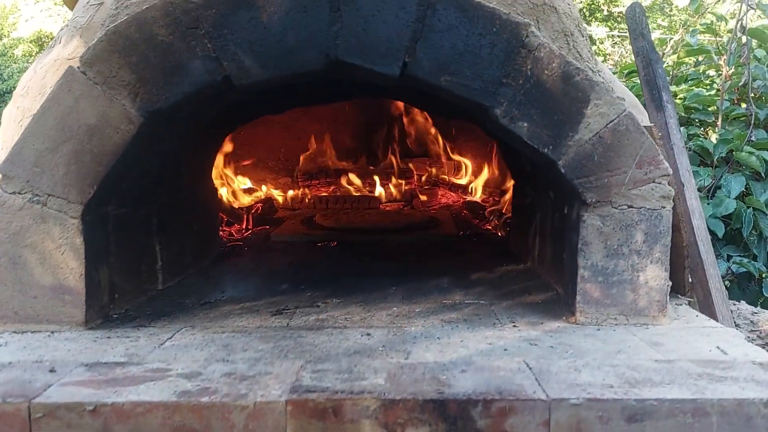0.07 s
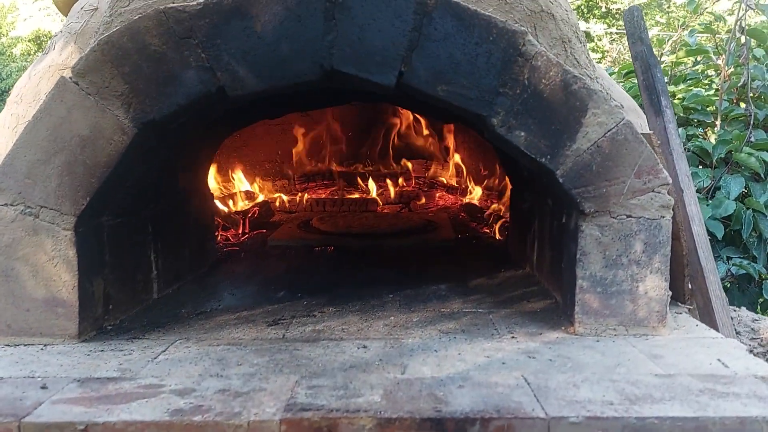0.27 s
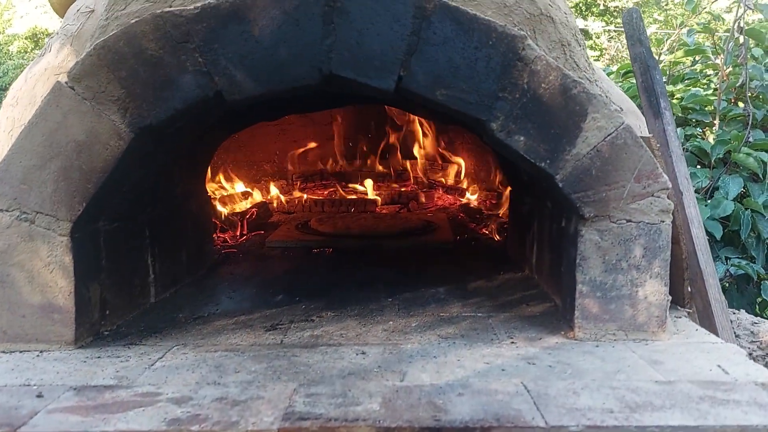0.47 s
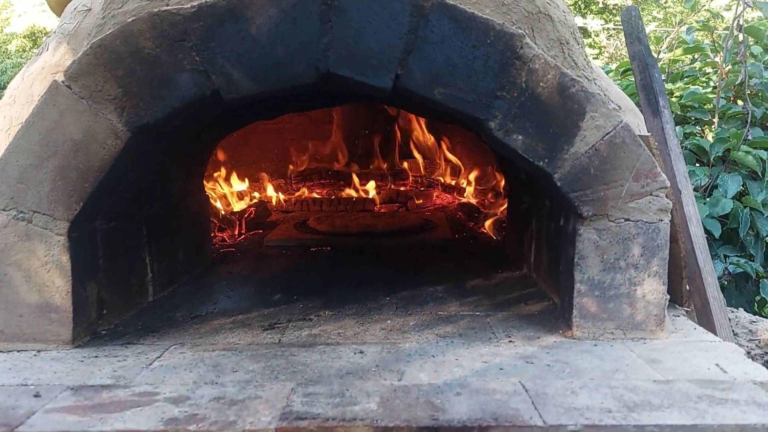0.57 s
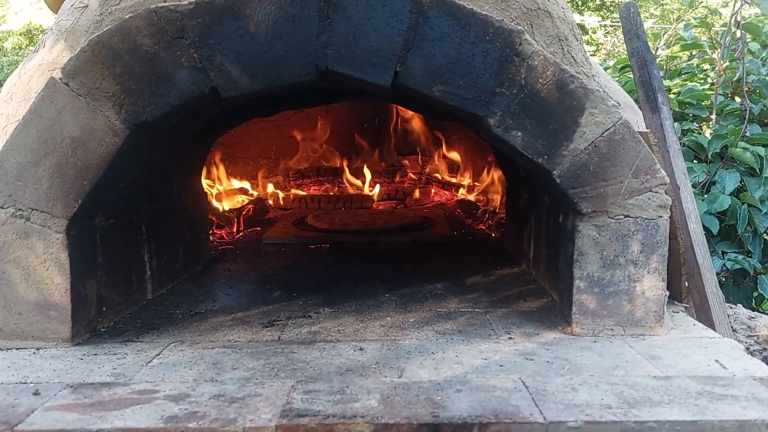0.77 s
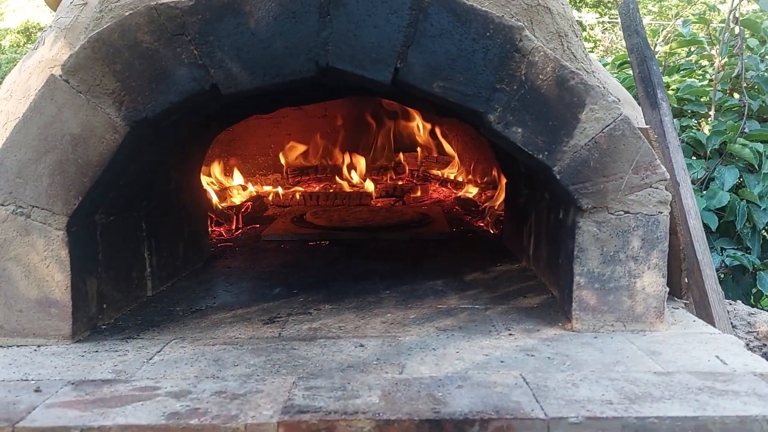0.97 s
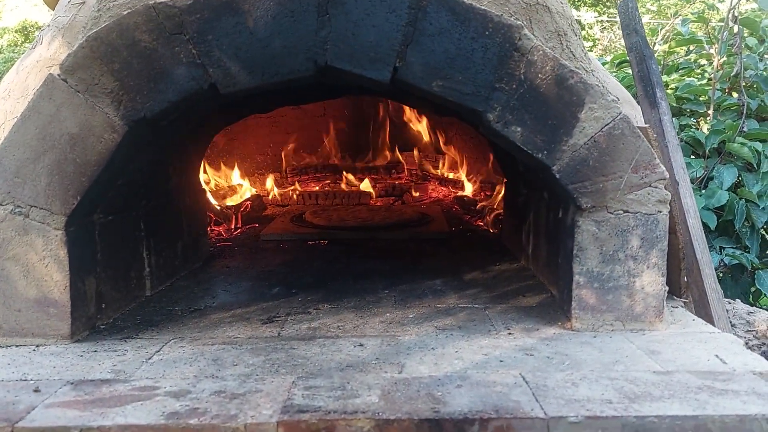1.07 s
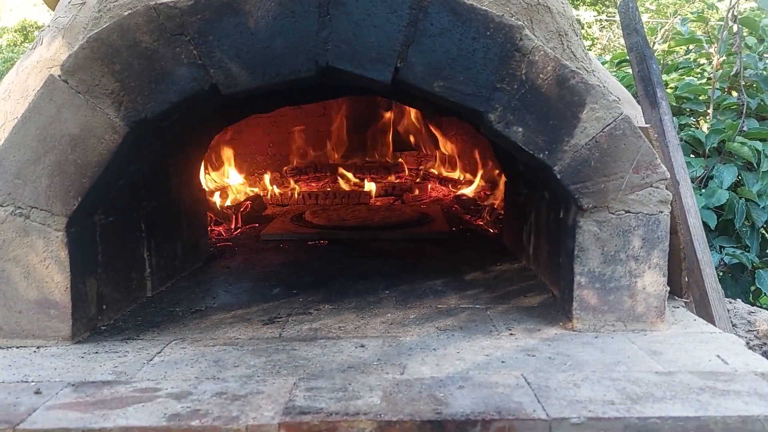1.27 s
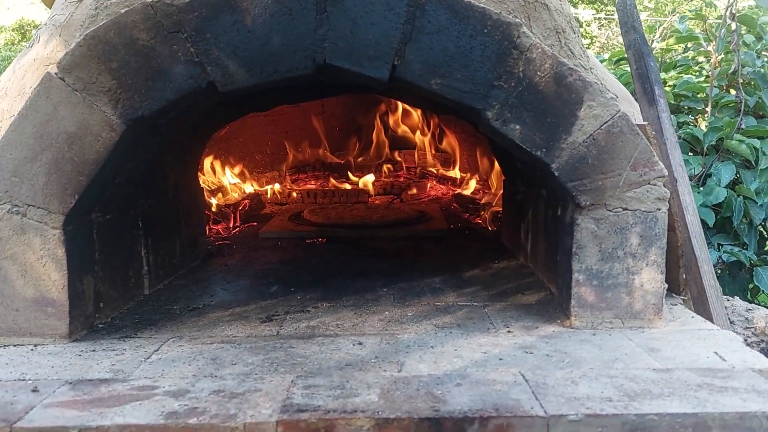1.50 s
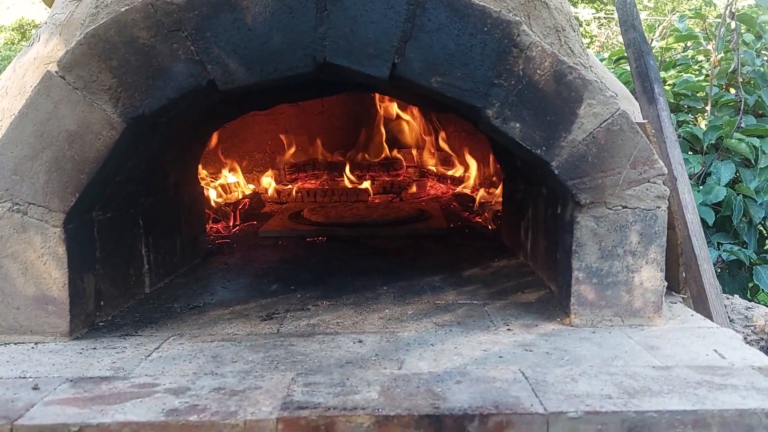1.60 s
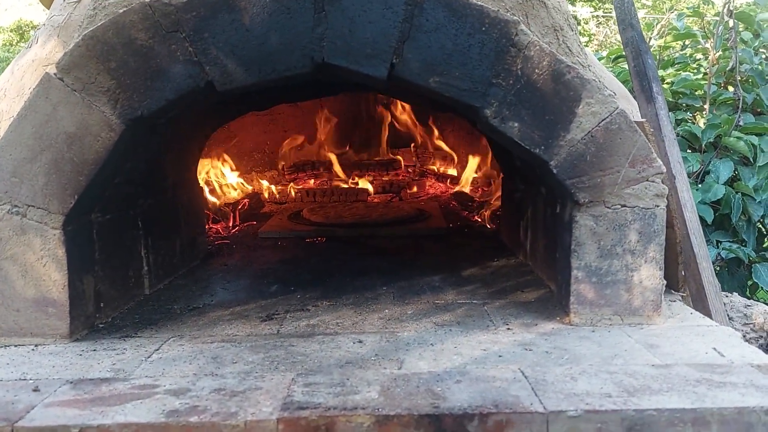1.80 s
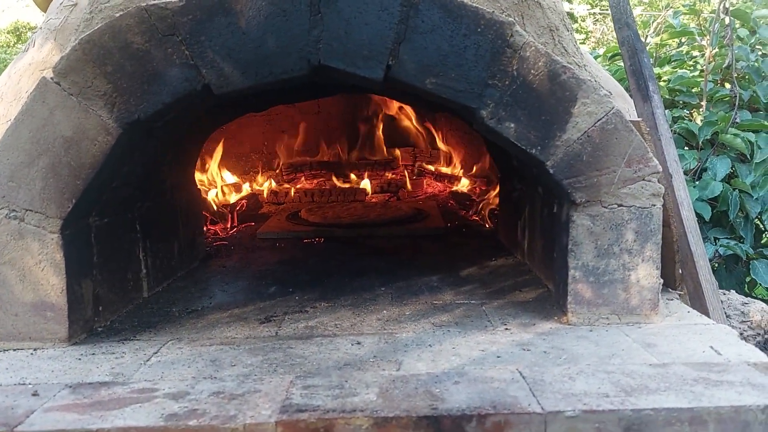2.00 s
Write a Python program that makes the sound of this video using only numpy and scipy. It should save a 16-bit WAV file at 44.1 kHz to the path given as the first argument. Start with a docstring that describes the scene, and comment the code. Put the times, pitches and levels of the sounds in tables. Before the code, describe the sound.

A crackling log fire pops and hisses inside a domed brick oven.

```python
"""Logs burn in a domed brick oven outdoors, heard from just outside its mouth.
Throughout, air hisses, flames rumble in the dome and embers tick. At first gas escapes from a log,
until steam splits the wood with a sharp pop at 0.2 s. Five more pops follow by 1.75 s; each rings
briefly off the bricks with a falling echo. Sizzling sap swells at the first pop, sinks, and is
loudest near the end. The left microphone is bright, the right stronger in the upper mids."""
import sys
import numpy as np
from scipy import signal
from scipy.fft import rfft, irfft
from scipy.io import wavfile
from scipy.ndimage import uniform_filter1d

SR = 44100
rng = np.random.default_rng(int(sys.argv[2]) if len(sys.argv) > 2 else 0)


def persist_wave(psi):
    """Save psi, clipped to +-1, as 16-bit WAV."""
    counts = np.round(np.clip(psi, -1, 1) * 32767).astype(np.int16)
    wavfile.write(sys.argv[1], SR, np.atleast_2d(counts).T)


N = 90404

# steam pops: start_s, right_lag_ms, length_ms, level_db, then colour_db per band
POPS = [(0.214, 0.14, 0.91, 11, -2, 0.5, -6.5, 5, 9, 1.5, 4, -5.5, -5.5, -9.5, -20),
        (0.3113, 0.24, 0.78, 6, 1.5, -4.5, 1, -1, -2.5, 3, 3.5, -1, 5.5, -3, -22),
        (0.8972, 0.28, 0.84, 3.5, 3.5, -5, -4, -9.5, -5, -7, 1.5, -1.5, 1, -3, -8),
        (1.0574, 0.26, 0.99, -2, -14, -21, -9, -12, -4, -11, 4, -1.5, 7, 4.5, -8),
        (1.3542, 0.087, 0.58, -1.5, -8, -17, -18, -11, -15, -4.5, -2.5, 3, 5, 2, 10),
        (1.7377, 0.28, 3.4, -8, -19, -1, -4, -6, -3, -17, -3.5, 1.5, 6.5, -7, -11)]
# air modes of the dome: pitch_hz, width_hz, flame_lift_db, ring_db
DOME_MODES = [(118.8, 7, 10.5, -18), (237.5, 48, 5.5, 0.5), (346.7, 14, 5.5, -21), (618, 24, 0, 7),
              (788, 45, 5.5, 3.5), (1054, 110, 2.5, 4)]


def amp(db):
    """Decibels to gain."""
    return 10 ** (np.asarray(db) / 20)


def curve_at(points, hz):
    """Interpolate a table over log frequency."""
    points_hz, values = np.transpose(points)
    return np.interp(np.log(hz + 1), np.log(points_hz + 1), values)


def envelope(points):
    """Gain per sample from rows of time_s, level_db."""
    return amp(np.interp(np.arange(N) / SR, *np.transpose(points)))


def add(mix, start_s, sound):
    """Mix in a stereo sound."""
    part = mix[:, max(round(start_s * SR), 0):][:, :sound.shape[1]]
    part += sound[:, :part.shape[1]]


def colour(x, points, size=2048):
    """Minimum-phase filter from rows of freq_hz, gain_db."""
    log_gain = np.log(amp(curve_at(points, abs(np.fft.fftfreq(size, 1 / SR)))))
    taps = np.fft.ifft(np.exp(np.conj(signal.hilbert(log_gain)))).real
    return signal.fftconvolve(x, taps[None, :size // 2], axes=1)[:, :x.shape[1]]


def flutter(depth_db, scale_s):
    """Randomly wandering gain."""
    hz = np.fft.rfftfreq(N, 1 / SR)
    drift = irfft(rfft(rng.standard_normal(N)) / (1 + (hz * 2 * scale_s) ** 4), N)
    return amp(depth_db * drift / drift.std())


def noise(spectrum, peaks=(), right_lag_ms=0.4895):
    """Partly coherent stereo noise with resonances."""
    # likeness of left and right: freq_hz, coherence
    likeness = [(100, 1), (260, 0.91), (500, 0.71), (850, 1), (1400, 0.75), (3300, 0.41), (5000, 0.17),
                (12000, 0.46)]
    hz = np.fft.rfftfreq(N, 1 / SR)
    left, other = rfft(rng.standard_normal((2, N)))
    coherence = np.clip(curve_at(likeness, hz), 0, 1)
    right = coherence * left + np.sqrt(1 - coherence ** 2) * other
    right *= np.exp(-2j * np.pi * hz * right_lag_ms / 1000)
    lift_db = sum(db / (1 + (2 * (hz - pitch_hz) / width_hz) ** 2)
                  for pitch_hz, width_hz, db, *_ in peaks)
    gain = amp(curve_at(spectrum, hz) + lift_db)
    return irfft(np.array([left, right]) * gain, N) * np.sqrt(SR / 2)


def hiss():
    """Even rush of air with a few narrow resonances."""
    # air: freq_hz, density_db
    spectrum = [(100, -100), (700, -85), (1300, -84.5), (2200, -85.5), (3000, -94), (4200, -91),
                (6000, -93.5), (8000, -95.5), (12000, -99), (16000, -100)]
    # resonances: pitch_hz, width_hz, lift_db
    peaks = [(1391, 24, 6.1), (1672, 200, 8.6), (1891, 91, 10.4), (2526, 89, 1.9), (3358, 160, 11.2)]
    return noise(spectrum, peaks) * flutter(depth_db=1.03, scale_s=0.15)


def flames():
    """Surging rumble, lifted at the air modes of the dome."""
    # rumble: freq_hz, density_db
    spectrum = [(20, -105), (36, -80.5), (55, -68.5), (78, -75), (105, -67), (170, -70.5), (260, -73),
                (420, -75.5), (600, -83.5), (1000, -86.5), (3000, -108)]
    # flame surges: time_s, level_db
    surge = [(0, -0.5), (.15, 2), (.36, -2.5), (.43, 2.5), (.52, -0.5), (.64, 0.5), (.75, 1.5), (.86, -1),
             (.94, 0), (1.02, 2), (1.1, -2), (1.27, 1.5), (1.38, 2.5), (1.5, -1), (1.63, -0.5), (1.74, 1),
             (1.84, 0.5), (2.05, 0)]
    rumble = noise(spectrum, DOME_MODES, right_lag_ms=0.28)
    return rumble * envelope(surge) * flutter(depth_db=0.47, scale_s=0.019)


def sizzle():
    """Sap boils out of the logs in a fine sputter."""
    # sap: freq_hz, density_db
    spectrum = [(1000, -120), (5000, -102), (9000, -101), (13000, -99), (16000, -102)]
    # swells: time_s, level_db
    swell = [(0, -22), (.2, 2), (.4, -16), (.62, -18), (.87, -30), (1.1, -14), (1.25, -13), (1.6, -2),
             (1.76, 2.5), (1.9, 9), (2.05, 1.5)]
    return noise(spectrum) * envelope(swell) * flutter(depth_db=2.5, scale_s=0.0046)


def gas_jet(fade_s=0.036):
    """Hollow hiss of gas leaving a log until the first pop splits it."""
    # gas: freq_hz, density_db
    spectrum = [(300, -105), (600, -79), (1130, -90), (1290, -72), (1530, -78.5), (1700, -80), (2200, -89),
                (4000, -100), (8000, -115)]
    since_pop_s = np.arange(N) / SR - POPS[0][0]
    return noise(spectrum) * np.clip(1 - since_pop_s / fade_s, 0, 1)


def crack(length_ms, right_lag_ms, size=1024):
    """Fibres snap and steam pushes out: a burst of even spectrum and unit energy."""
    steam_push, shared_below_hz = 1, 2920
    hz = np.fft.rfftfreq(size, 1 / SR)
    age = np.arange(size) / SR * 1000 / length_ms
    fibres = rng.standard_normal((2, size))
    left, other = rfft((fibres + steam_push) * age * np.exp(-2 * age))
    coherence = 1 / (1 + (hz / shared_below_hz) ** 4)
    spectra = np.array([left, coherence * left + np.sqrt(1 - coherence ** 2) * other])
    for _ in range(4):  # flatten the spectrum, keep the burst short
        power = abs(uniform_filter1d(abs(spectra) ** 2, 13, axis=1))
        burst = irfft(spectra / np.sqrt(power + 1e-12)) * np.exp(-(age / 5) ** 4)
        spectra = rfft(burst)
    burst[1] = np.pad(burst[1], (round(right_lag_ms * SR / 1000), 0))[:size]
    return burst / np.linalg.norm(burst, axis=1, keepdims=True)


def ticks(length_ms=1.57, right_lag_ms=0.877, crackle_per_s=98, variants=12):
    """Small snaps in the embers over a random, fainter crackle."""
    # snaps: start_s, level_db
    snaps = [(0.065, -17.5), (.073, -20), (0.161, -13.5), (0.165, -18), (0.175, -17), (0.2842, -11.5),
             (0.3643, -16.5), (0.5678, -16), (0.575, -15), (.684, -22.5), (0.964, -25), (1.1005, -19),
             (1.1366, -16), (1.1824, -21.5), (1.2523, -20), (1.703, -18), (1.8539, -16), (1.973, -16),
             (2.023, -17)]
    # tick colour: freq_hz, gain_db
    tone = [(200, 3.5), (1500, -7), (3500, -7.5), (6000, -6.5), (9000, -2), (15000, -10)]
    out = np.zeros((2, N))
    for start_s, level_db in snaps:
        add(out, start_s, amp(level_db) * crack(length_ms, right_lag_ms))
    crackle_db = -28.5 + np.minimum(rng.exponential(1, N), 3.5)
    impulses = amp(crackle_db) * (rng.random(N) < crackle_per_s / SR)
    variant = rng.integers(0, variants, N)
    for k in range(variants):
        burst = crack(length_ms / 2, right_lag_ms)
        out += signal.oaconvolve((impulses * (variant == k))[None], burst, axes=1)[:, :N]
    return colour(out, tone)


def pops():
    """Pockets of steam split the wood, each with its own colour and little bass."""
    # colour bands of POPS: freq_hz
    bands_hz = [250, 420, 700, 1100, 1700, 2700, 3900, 6300, 10000, 12500, 15000]
    # stereo balance: freq_hz, left_minus_right_db
    lean = [(300, -0.5), (1000, 2), (2000, 10.5), (2600, 7), (3800, -3), (6500, 3.5), (10000, -4),
            (14000, 9)]
    out = np.zeros((2, N))
    for start_s, right_lag_ms, length_ms, level_db, *colour_db in POPS:
        tone = [(60, colour_db[0] - 20), *zip(bands_hz, colour_db)]
        burst = np.pad(crack(length_ms, right_lag_ms), ((0, 0), (0, SR // 50)))
        add(out, start_s, amp(level_db) * colour(burst, tone))
    lean_db = curve_at(lean, np.fft.rfftfreq(N, 1 / SR))
    return irfft(rfft(out) * amp([lean_db / 2, -lean_db / 2]), N)


def oven(x):
    """Direct sound, brick reflections, and the ring and falling echo of the dome."""
    # early reflections: freq_hz, gain_db
    early = [(300, -23), (800, 2), (2000, -2.5), (6000, 2), (12000, 5)]
    # late reflections: freq_hz, gain_db
    late = [(300, 0), (2000, 0), (6000, 0.65), (12000, 2.4)]
    t = np.arange(SR // 4) / SR
    response = np.zeros((2, len(t)))
    for level_db, t60_s, tone in [(-11.5, 0.027, early), (-16, 0.089, late)]:
        tail = rng.standard_normal(response.shape) * 10 ** (-3 * t / t60_s) * (t > 0.0012)
        response += amp(level_db) * colour(tail / np.linalg.norm(tail, axis=1, keepdims=True), tone)
    for pitch_hz, width_hz, _, ring_db in DOME_MODES:
        ring = np.exp(-np.pi * width_hz * t) * np.cos(2 * np.pi * pitch_hz * t)
        response += amp(ring_db) * 2 * np.pi * width_hz / SR * ring
    # the low vault delays deep tones most, so its echo falls in pitch
    start_hz, end_hz, fall_s, swell_s, echo_db = 1400, 530, 0.007, 0.005, -19.5
    echo_hz = end_hz + (start_hz - end_hz) * np.exp(-t / fall_s)
    echo = t * np.exp(-t / swell_s) * np.sin(2 * np.pi * np.cumsum(echo_hz) / SR)
    response -= amp(echo_db) * echo / np.linalg.norm(echo)
    response[:, 0] += 1  # direct sound
    return signal.fftconvolve(x, response, axes=1)[:, :N]


def scene():
    """Pops and ticks ring in the oven over the noise of the fire."""
    return oven(pops() + ticks()) + flames() + hiss() + sizzle() + gas_jet()


def record(dry, low_cut_hz=40, high_cut_hz=16000):
    """Microphone colour, low cut, full-scale clipping, band limit."""
    # left microphone: freq_hz, gain_db
    left_mic = [(60, 0.5), (600, -2), (1000, -4.5), (1900, -7), (2700, 2), (4100, -3), (5500, 0), (6900, 3),
                (9000, -16), (10500, -5.5), (12500, 5.5), (15500, -2)]
    # right microphone: freq_hz, gain_db
    right_mic = [(60, 2.5), (600, -1.5), (1000, -1), (1900, 0.5), (2600, 3), (3700, 4.5), (5700, 7.5),
                 (7000, -0.5), (8300, -10), (10700, -6.5), (13000, -9), (16000, -25)]
    pair = np.vstack([colour(dry[:1], left_mic), colour(dry[1:], right_mic)])
    pair = signal.sosfilt(signal.butter(4, low_cut_hz, "high", fs=SR, output="sos"), pair)
    low_pass = signal.firwin(301, high_cut_hz, window=("kaiser", 9), fs=SR)
    return signal.oaconvolve(np.clip(pair, -1, 1), low_pass[None], "same")


dry = scene()
out = record(dry)
persist_wave(out)
```